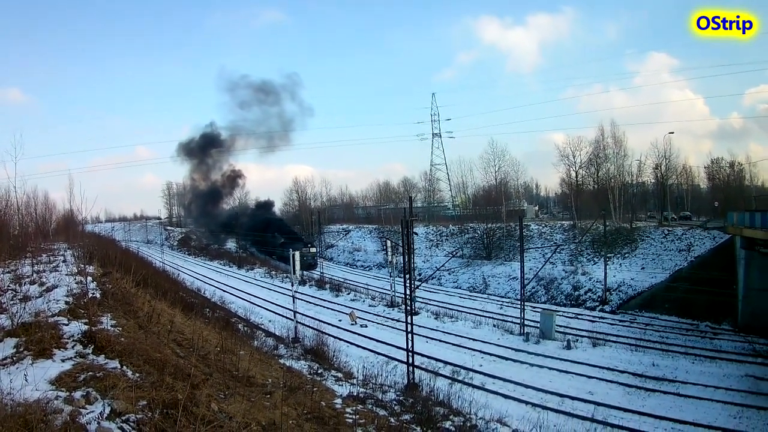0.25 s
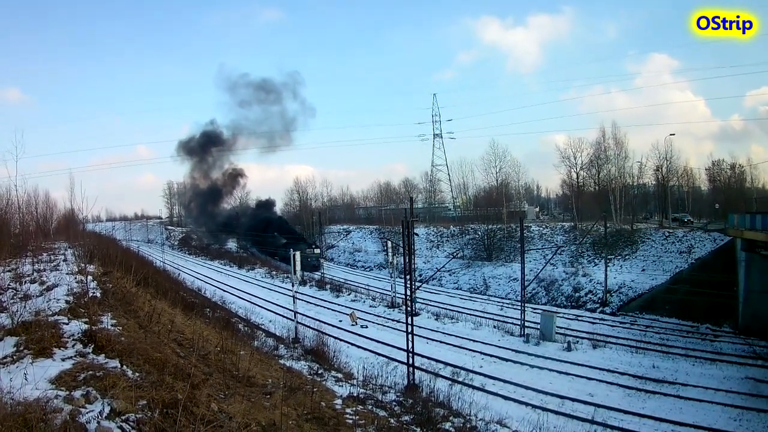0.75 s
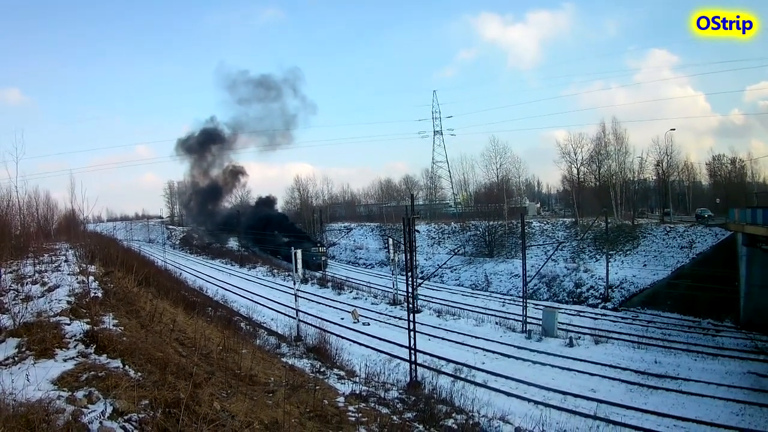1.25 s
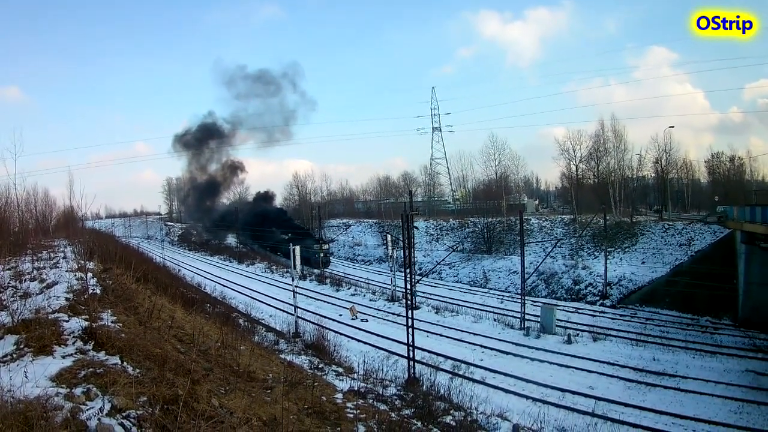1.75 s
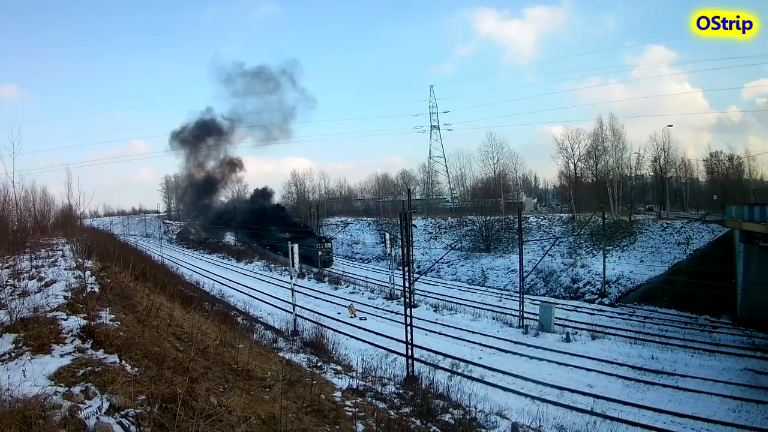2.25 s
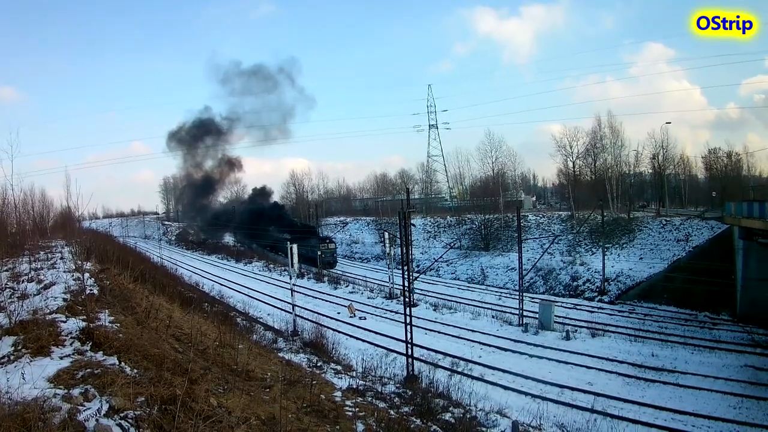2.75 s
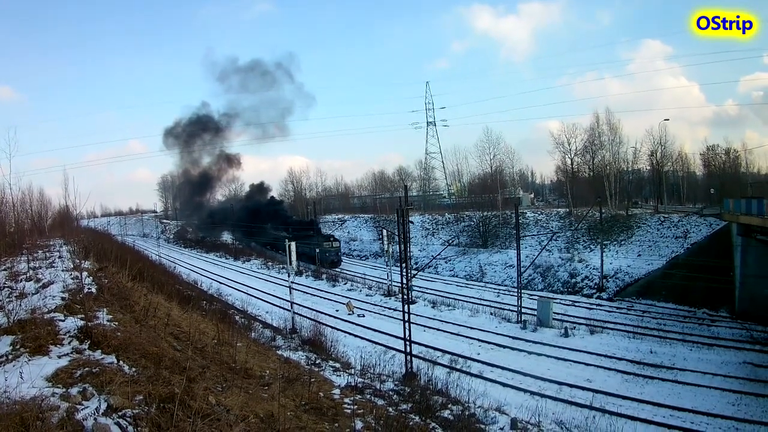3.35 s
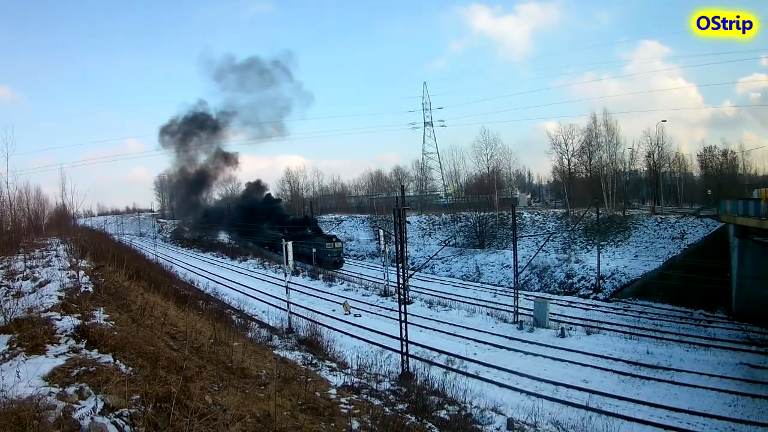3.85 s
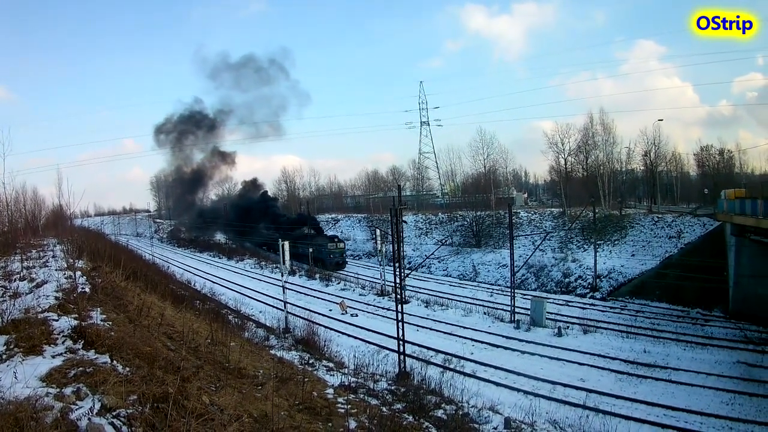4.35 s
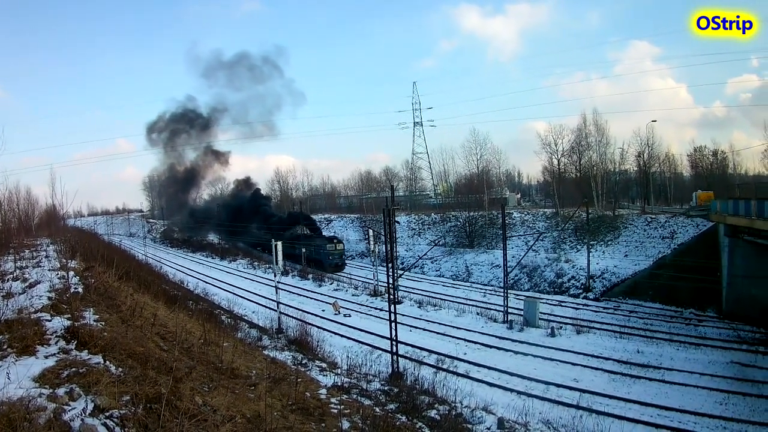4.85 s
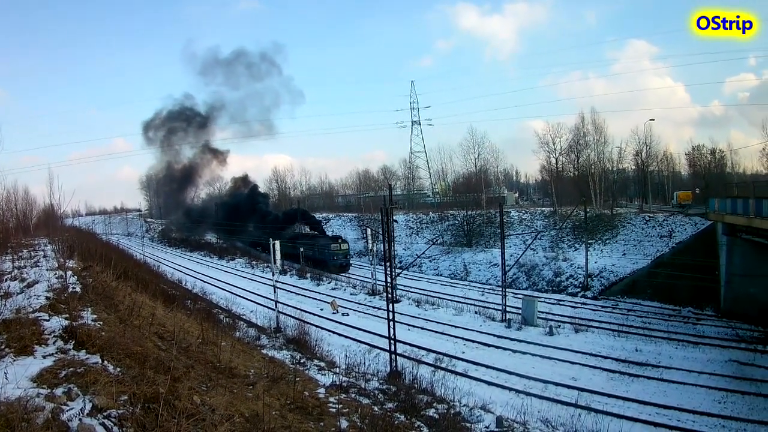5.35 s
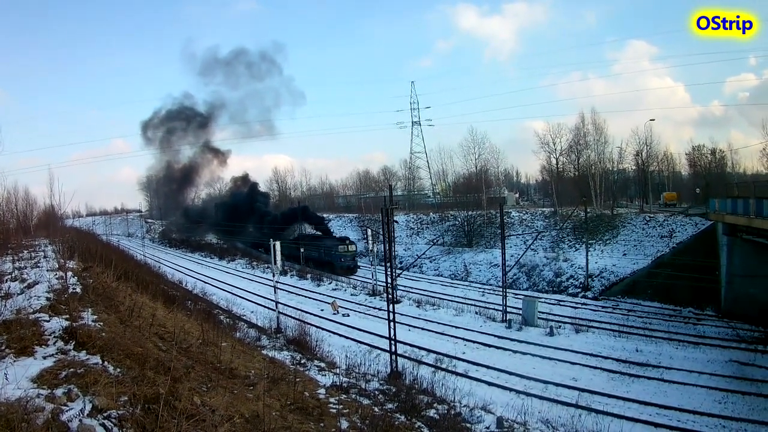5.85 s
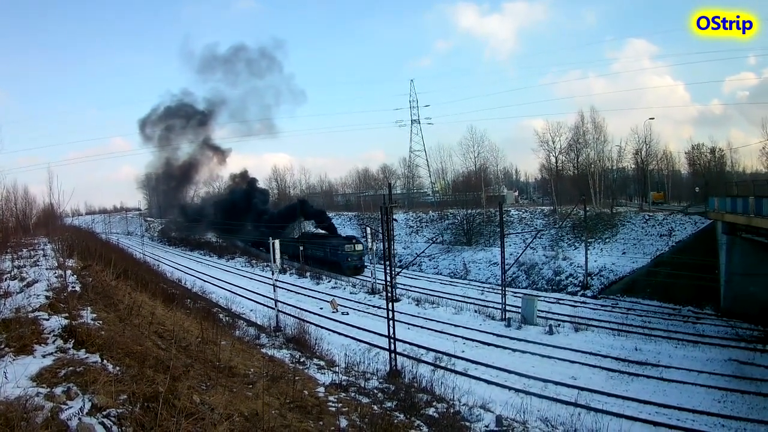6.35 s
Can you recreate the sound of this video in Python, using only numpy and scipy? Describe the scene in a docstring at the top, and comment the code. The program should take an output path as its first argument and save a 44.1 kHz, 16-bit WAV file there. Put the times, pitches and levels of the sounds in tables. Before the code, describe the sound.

Steady rushing roar and low drone of a hard-working diesel train in the open, with soft microphone bumps, light gusts and a late faint wheel squeak.

```python
"""In a snowy cutting, some way off, a diesel locomotive labours at steady revs with a freight train.
Its firings throb as a set of low tones and puff a rushing roar, noise that rings in the stack's resonances.
The roar swells and fades in the moving air, and brief wavering tones thicken it. The wagons rumble as shaped
noise and a wheel squeaks faintly in short tones. Two soft bumps and light gusts reach a hissing microphone."""
import sys
import numpy as np
from scipy import signal
from scipy.fft import rfft, irfft
from scipy.io import wavfile
from scipy.ndimage import uniform_filter1d, map_coordinates

SR = 44100
rng = np.random.default_rng(int(sys.argv[2]) if len(sys.argv) > 2 else 0)


def dump(signal):
    """Clip the signal to [-1, 1] and save it as 16-bit WAV at the path in sys.argv[1]."""
    limited = np.clip(np.atleast_2d(signal).T, -1, 1)
    pcm = np.round(limited * 32767).astype(np.int16)
    wavfile.write(sys.argv[1], SR, pcm)


N = 291501
TIME = np.arange(N) / SR  # seconds
FREQS = np.maximum(np.fft.rfftfreq(N, 1 / SR), 1)  # Hz, kept off zero

# In all tables a half length is the time from a swell's peak to 1/e of it.
# Mode levels and spectrum levels are relative: the finished noise is scaled to unit power.

# Background hiss, a spectrum: f/Hz, level per Hz/dB
HISS_SPECTRUM = [(1000, 3.5), (4500, 1.5), (5300, -1), (5700, -0.5), (6800, 0), (7600, 2.5), (8600, 0.5),
                 (9800, -0.5), (10700, 1.5), (11600, 0), (12000, -2)]
# Steady electronic whine: f/Hz, rms level/dB
WHINE_TONES = [(180, -60), (300, -63), (7025, -74), (10507, -69), (10807, -74.5)]
CUTOFF_HZ = 12080  # top of the recorded range

# Gusts on the microphone: t/s, rms level at the peak/dB, half length/s
GUST_TIMES = [(2.002, -32, 0.029), (2.26, -39, 0.054), (5.281, -37, 0.078), (5.661, -36.5, 0.062)]
# Buffeting of the gusts, a spectrum: f/Hz, level per Hz/dB
BUFFET_SPECTRUM = [(65, 7), (85, 3), (170, 0)]

# Bumps on the microphone: t/s, height before the low cut/dB, snap time/s, decay/s, knock level/dB
BUMP_TIMES = [(2.5288, -18.5, 0.0006, 0.005, -27), (3.7648, -15.5, 0.0013, 0.0034, -38)]
# The push ahead of a bump's pull: level against the pull, lead, half length
PUSH_DB, PUSH_LEAD_S, PUSH_S = -7.5, 0.0042, 0.0018
KNOCK_HZ, KNOCK_S = 413, 0.0025  # ring of the microphone housing: pitch, half length
LOW_CUT_HZ = 14  # the microphone passes no steady pressure

# The wheel flange rubs on the rail, one row: t/s, rms level at the peak/dB, half length/s
FLANGE_RUB = (6.16, -52.5, 0.17)
# Modes of the rubbed wheel: f/Hz, width/Hz, level/dB
RUBBED_WHEEL_MODES = [(2870, 170, 1), (3535, 250, -4), (3950, 123, 0)]
# The flange catches the rail: t/s, wheel mode f/Hz, rms level at the peak/dB, half length/s
FLANGE_SQUEAKS = [(6.03, 2854, -54, .016), (6.035, 3930, -56, .02), (6.083, 2810, -50, .016),
                  (6.11, 3920, -57, .014), (6.153, 3915, -44, .013), (6.165, 5100, -55, .018),
                  (6.167, 5300, -57, .018), (6.168, 3830, -52, .012), (6.172, 2840, -45.5, 0.014),
                  (6.19, 3530, -52, .014), (6.205, 2700, -52.5, .012), (6.142, 2790, -53, .009),
                  (6.235, 2870, -55, .008), (6.291, 3880, -57, 0.011), (6.303, 2830, -54, .009),
                  (6.323, 3930, -48, .01), (6.35, 2803, -57, .012)]

# Rumble of the rolling train, a spectrum: f/Hz, level per Hz/dB
RUMBLE_SPECTRUM = [(10, -10), (14, 0.5), (28, -2), (48, 3), (72, -2), (95, -4), (150, -5), (210, -7),
                   (300, -8.5), (440, -11.5), (600, -13), (900, -13.5), (2000, -18), (3200, -35)]
# Steady resonances of the locomotive body: f/Hz, width/Hz, level/dB
LOCOMOTIVE_BODY_MODES = [(241.7, 13, 2), (1370, 200, -7)]
RUMBLE_DB, BODY_DB = -34.5, -47  # rms levels halfway through
NEARING_DB_PER_S = 0.08  # both grow slowly

CYCLE_HZ = 3.575  # four-stroke cycles per second, around which the engine drifts
# Lines of the exhaust note: multiple of the cycle rate, level/dB on top of the note's level
NOTE_LINES = [(6, -14), (10, -13), (11, -14), (12, -6.5), (13, -11), (14, -7.5), (15, -11.5), (16, -11.5),
              (18, -16), (22, -15), (44, -23)]
# Level of the low exhaust note: t/s, level/dB
NOTE_LEVEL_CURVE = [(0, -37.5), (0.9, -37), (1.95, -39.5), (2.15, -31), (2.6, -34.5), (3.1, -36.5),
                    (3.6, -34), (4.4, -37.5), (5.1, -38), (5.35, -32), (5.6, -34.5), (6.2, -38.5),
                    (6.6, -33)]

# Brief tones that thicken the roar around 1200 and 1650 Hz:
# t/s, f/Hz, rms level at the peak/dB, half length/s
THICKENING_TONES = [(0.993, 1205, -32.5, .024), (1.053, 1631, -40, .04), (1.565, 1192, -34.5, .024),
                    (1.75, 1205, -33.5, .06), (1.841, 1251, -35, .03), (2.01, 1114, -35.5, .03),
                    (2.205, 1192, -30, .024), (3.94, 1222, -33.5, .03), (4.07, 1631, -38.5, .04),
                    (4.112, 1227, -31.5, .022), (4.155, 1701, -38.5, .04), (4.315, 1222, -29.5, .028),
                    (4.413, 1154, -28.5, .026), (4.48, 1200, -32, .024), (4.738, 1195, -30, .026)]

# Stack resonances of the roar, in groups that fade together: f/Hz, width/Hz, level/dB
MAIN_STACK_MODES = [(1198, 141, -0.5), (1113, 120, -4), (1018, 190, -8.5), (1297, 217, -10.5)]
BRIGHT_STACK_MODES = [(1417, 86, -6.5), (1620, 160, 2.5), (1725, 234, 0)]
EDGE_STACK_MODES = [(2010, 230, 3.5), (2264, 610, -10)]  # upper edge of the roar
HOLLOW_STACK_MODES = [(833, 445, 1.5), (2410, 360, -13.5)]
# Turbocharger jet, a spectrum: f/Hz, level per Hz/dB
JET_SPECTRUM = [(1800, -22), (2300, -15), (2800, 3.5), (2960, -4), (3150, 2.5), (3850, 3), (4050, -3.5),
                (4350, -10.5), (4500, -6.5), (4900, -18), (5300, -4.5), (5600, -14), (9000, -16.5)]
# Level of each group and of the jet, as the wind carries them: t/s, level/dB
MAIN_LEVEL_CURVE = [(0, -35.5), (0.42, -34.5), (0.76, -36), (0.85, -32), (1.3, -30.5), (1.62, -30),
                    (2.15, -28.5), (2.3, -29), (2.41, -28.5), (2.56, -32), (2.88, -30.5), (3.38, -34.5),
                    (3.75, -31.5), (4.0, -26.6), (4.3, -26), (4.48, -26.5), (4.56, -30.8), (4.72, -26),
                    (4.85, -29), (5.08, -26.6), (5.21, -27.7), (5.28, -32), (5.42, -29.5), (5.58, -32.5),
                    (6.12, -32.5), (6.25, -35.6), (6.45, -35.5), (6.6, -36)]
BRIGHT_LEVEL_CURVE = [(0, -44), (0.66, -40.5), (1.04, -33.5), (1.3, -34.5), (1.6, -39.5), (2.6, -39.5),
                      (2.95, -36), (3.44, -41.5), (3.75, -37.5), (4.13, -31), (4.58, -40.5), (4.72, -37),
                      (5.0, -37.5), (5.13, -33.5), (5.27, -40.5), (6.0, -39), (6.6, -46)]
EDGE_LEVEL_CURVE = [(0, -47), (0.7, -45.5), (0.9, -44), (2.15, -43.5), (2.6, -48), (3.65, -47.5),
                    (3.85, -41), (4.05, -42), (4.2, -46), (4.55, -46.5), (4.85, -42.2), (5.2, -42.2),
                    (5.35, -46), (6.0, -48.5), (6.6, -57)]
HOLLOW_LEVEL_CURVE = [(0, -61), (1.0, -48), (1.6, -37), (2.05, -35), (2.65, -42.5), (3.4, -46.5),
                      (4.65, -38.5), (5.15, -44), (5.6, -65), (6.6, -53)]
JET_LEVEL_CURVE = [(0, -56.5), (1.3, -48), (2.05, -55), (2.85, -49), (3.6, -53), (3.8, -47), (4.45, -47),
                   (4.58, -50), (5.15, -48.5), (5.9, -53), (6.6, -52.5)]
# Centre of the strongest main resonance: t/s, f/Hz
ROAR_PITCH_CURVE = [(0, 1187), (1.0, 1195), (1.75, 1204), (2.1, 1158), (2.4, 1203), (3.05, 1199),
                    (3.4, 1167), (3.9, 1214), (4.35, 1210), (5.2, 1191), (6.6, 1181)]
# Chance swells in the roar's noise, a few milliseconds long: t/s, extra level at the peak/dB, half length/s
NOISE_SWELLS = [(3.156, 2, 0.0059), (4.66, 6, .004), (5.032, 2, .006), (5.119, 6, 0.0053)]


def from_db(db):
    """Turn decibels into a gain."""
    return 10 ** (np.asarray(db) / 20)


def rms_one(x):
    """Scale a sound to unit power."""
    return x / np.sqrt(np.mean(x ** 2) + 1e-20)


def curve(rows):
    """Join a table's (time, value) points by straight lines, one value per sample."""
    times, values = np.transpose(rows)
    return np.interp(TIME, times, values)


def swell(s, half):
    """Rise and fall smoothly around time s."""
    return np.exp(-((TIME - s) / half) ** 2)


def sine(phase):
    """A sine of unit power; phase counts turns."""
    return np.sqrt(2) * np.sin(2 * np.pi * phase)


def drift(rate_hz):
    """Wander slowly at random with unit power: noise with its fast changes removed."""
    gain = 1 / (1 + (FREQS / rate_hz) ** 2)
    return rms_one(irfft(rfft(rng.standard_normal(N)) * gain, N))


def coloured(spectrum):
    """Shape noise by a spectrum that falls away beyond its ends."""
    hz, db = np.transpose(spectrum)
    low_end = np.minimum(FREQS / hz[0], 1) ** 2
    high_end = np.minimum(hz[-1] / FREQS, 1) ** 2
    gain = low_end * high_end * from_db(np.interp(np.log(FREQS), np.log(hz), db))
    return rms_one(irfft(rfft(rng.standard_normal(N)) * gain, N))


def resonant(modes, drive=1):
    """Let rushing noise of strength drive ring in resonances, each applied twice for steep sides."""
    total = 0
    for hz, width, db in modes:
        response = 1 / (1 + 1j * hz / width * (FREQS / hz - hz / FREQS))
        noise = rfft(drive * rng.standard_normal(N))
        total = total + from_db(db) * response ** 2 * noise
    return rms_one(irfft(total, N))


def evened(x, span_s, share):
    """Take a share of the chance swings slower than span_s out of a noise; unit power."""
    size = int(span_s * SR)
    power = uniform_filter1d(uniform_filter1d(x ** 2, size), size)
    return rms_one(x / (power + 1e-20) ** (share / 2))


def retuned(x, ratio):
    """Play x faster or slower so that its pitch follows ratio."""
    return map_coordinates(x, [np.cumsum(ratio)], order=3, mode="grid-wrap")


def brief_tones(rows, wobble, wobble_rate_hz, rough_db):
    """Sound single tones: each swells and fades, with wavering pitch and rough level."""
    warped_time = np.cumsum(1 + wobble * drift(wobble_rate_hz)) / SR
    roughness = rms_one(from_db(rough_db * drift(90)))
    tones = 0
    for s, hz, db, half in rows:
        tones = tones + from_db(db) * swell(s, half) * sine(hz * warped_time)
    return roughness * tones


def microphone_noise(hiss_db, waver_db):
    """A hiss whose level wavers slightly at random, with faint steady electronic tones."""
    hiss = from_db(hiss_db + waver_db * drift(22)) * coloured(HISS_SPECTRUM)
    whine = sum(from_db(db) * sine(hz * TIME) for hz, db in WHINE_TONES)
    return hiss + whine


def gusts():
    """Light gusts ruffle the microphone: low noise that swells and fades."""
    strength = sum(from_db(db) * swell(s, half) for s, db, half in GUST_TIMES)
    return strength * coloured(BUFFET_SPECTRUM)


def bumps():
    """A small push of pressure snaps over into a pull, with a brief knock of the housing."""
    pressure = 0
    for s, db, snap, decay, knock_db in BUMP_TIMES:
        age = TIME - s
        push = from_db(PUSH_DB) * swell(s - PUSH_LEAD_S, PUSH_S)
        pull = swell(s, np.where(age < 0, snap, decay))
        ring = np.sin(2 * np.pi * KNOCK_HZ * (age + snap))
        knock = from_db(knock_db) * ring * swell(s, KNOCK_S)
        pressure = pressure + from_db(db) * (push - pull) - knock
    low_cut = signal.butter(1, LOW_CUT_HZ, "high", fs=SR, output="sos")
    return signal.sosfilt(low_cut, pressure + 1e-18)


def rubbing():
    """The flange rubs softly on the rail around its catches: noise ringing in the wheel."""
    s, db, half = FLANGE_RUB
    return from_db(db) * swell(s, half) * resonant(RUBBED_WHEEL_MODES)


def squeaks():
    """The flange catches the rail and sets single modes of the wheel singing."""
    return brief_tones(FLANGE_SQUEAKS, wobble=0.0064, wobble_rate_hz=67, rough_db=1.0)


def train():
    """Wheels rumble evenly on the rails and the body drones, both growing as the train nears."""
    nearing_db = NEARING_DB_PER_S * (TIME - TIME.mean())
    rumble = from_db(RUMBLE_DB) * evened(coloured(RUMBLE_SPECTRUM), span_s=0.11, share=0.42)
    drone = from_db(BODY_DB) * resonant(LOCOMOTIVE_BODY_MODES)
    return from_db(nearing_db) * (rumble + drone)


def crankshaft():
    """Count engine cycles as they pass, at a rate that drifts slightly."""
    return np.cumsum(CYCLE_HZ * (1 + 0.0025 * drift(0.94))) / SR


def exhaust_note(cycle, waver_db):
    """Unequal cylinders put a tone on multiples of the cycle rate; each wavers in the air."""
    note_db = curve(NOTE_LEVEL_CURVE)
    note = 0
    for multiple, db in NOTE_LINES:
        level = from_db(note_db + db + waver_db * drift(1.7))
        note = note + level * sine(multiple * cycle + rng.random())
    return note


def thickening_tones():
    """Brief wavering tones thicken the roar's noise around 1200 and 1650 Hz."""
    return brief_tones(THICKENING_TONES, wobble=0.0119, wobble_rate_hz=33.5, rough_db=-2.5)


def puffs(cycle, depth, uneven_db, count):
    """Gas flow in the stack: one puff per firing, count per cycle, each of its own strength."""
    firing = count * (cycle - cycle[0])
    strength_db = uneven_db * rng.standard_normal(int(firing[-1]) + 2)
    strength = from_db(np.interp(firing, np.arange(len(strength_db)), strength_db))
    return strength * (1 + depth * np.cos(2 * np.pi * firing))


def roar(flow):
    """Puffing gas rings in the stack; the wind swells each group of resonances and the jet in turn."""
    # The main resonances wander together in pitch.
    pitch_ratio = curve(ROAR_PITCH_CURVE) / MAIN_STACK_MODES[0][0]
    main = evened(retuned(resonant(MAIN_STACK_MODES, flow), pitch_ratio), span_s=0.073, share=1.0)
    noise_swell_db = sum(db * swell(s, half) for s, db, half in NOISE_SWELLS)
    bright = evened(resonant(BRIGHT_STACK_MODES, flow), span_s=0.069, share=0.41)
    parts = [(MAIN_LEVEL_CURVE, from_db(noise_swell_db) * main),
             (BRIGHT_LEVEL_CURVE, bright),
             (EDGE_LEVEL_CURVE, resonant(EDGE_STACK_MODES, flow)),
             (HOLLOW_LEVEL_CURVE, resonant(HOLLOW_STACK_MODES, flow)),
             (JET_LEVEL_CURVE, coloured(JET_SPECTRUM))]
    return sum(from_db(curve(level)) * sound for level, sound in parts)


def scene():
    """Add up all sources; one crankshaft drives both the low note and the roar."""
    microphone = microphone_noise(hiss_db=-47.5, waver_db=0.92) + gusts() + bumps()
    wheel = rubbing() + squeaks()
    cycle = crankshaft()
    flow = puffs(cycle, depth=0.059, uneven_db=0.98, count=12)
    engine = exhaust_note(cycle, waver_db=0.2) + thickening_tones() + roar(flow)
    return (microphone + wheel + train() + engine)[None]


def record(dry):
    """Cut the treble steeply above the cutoff."""
    treble_cut = signal.ellip(14, 0.1, 70, CUTOFF_HZ, fs=SR, output="sos")
    return signal.sosfilt(treble_cut, dry)


dry = scene()
out = record(dry)
dump(out)
```